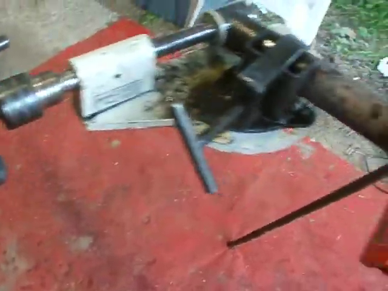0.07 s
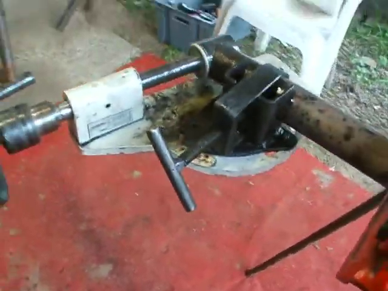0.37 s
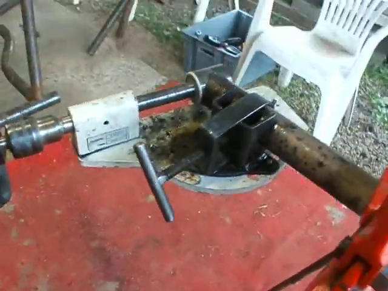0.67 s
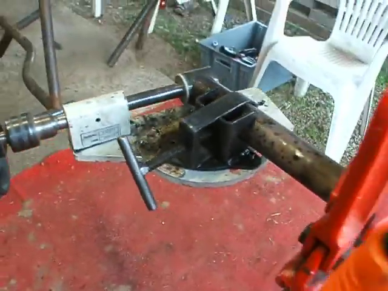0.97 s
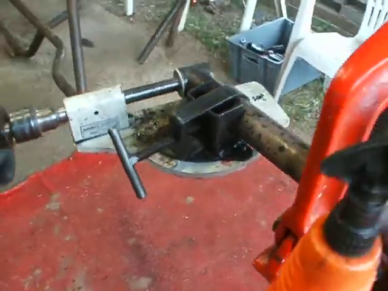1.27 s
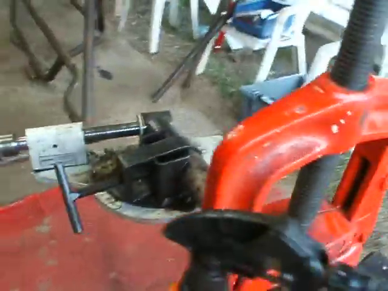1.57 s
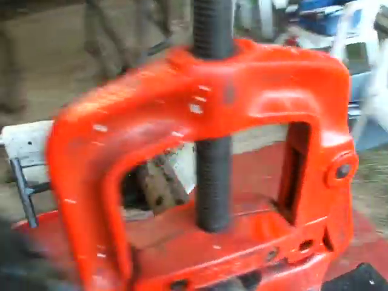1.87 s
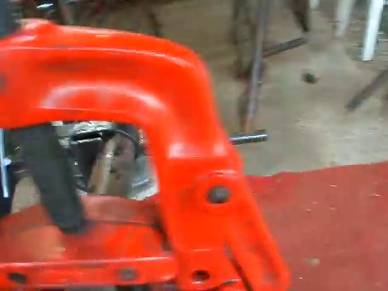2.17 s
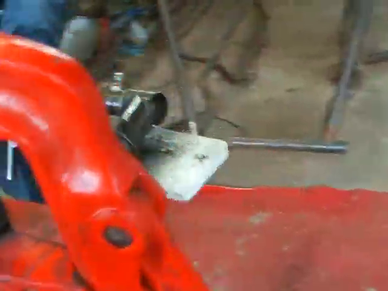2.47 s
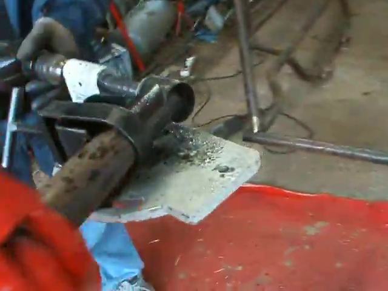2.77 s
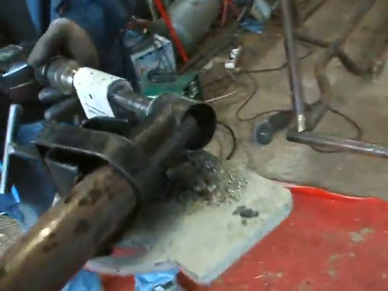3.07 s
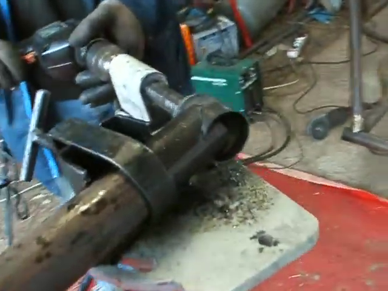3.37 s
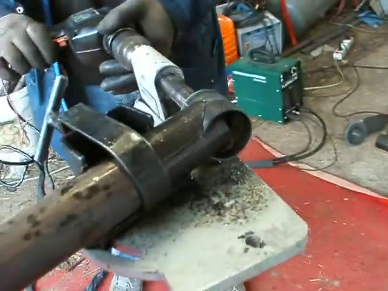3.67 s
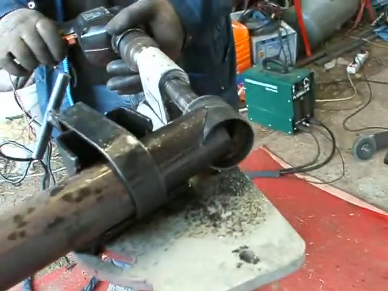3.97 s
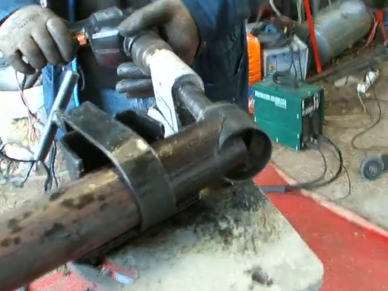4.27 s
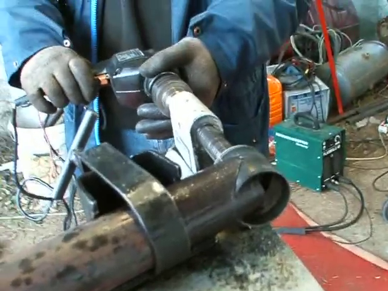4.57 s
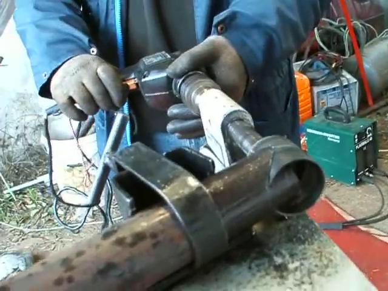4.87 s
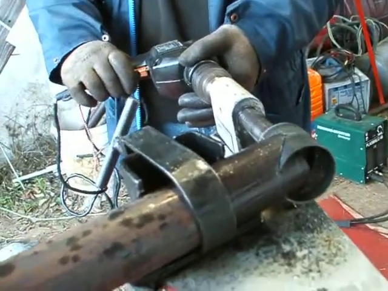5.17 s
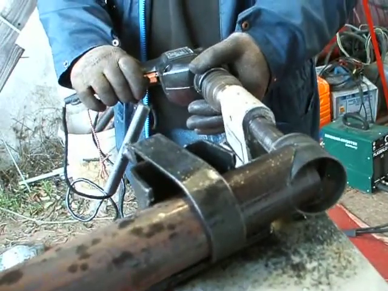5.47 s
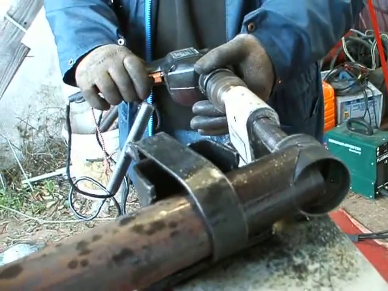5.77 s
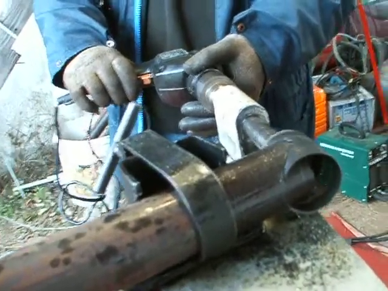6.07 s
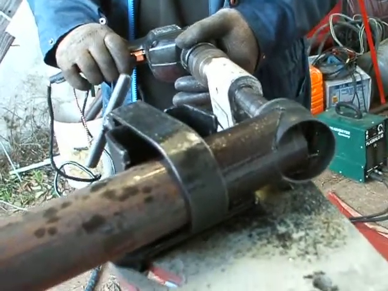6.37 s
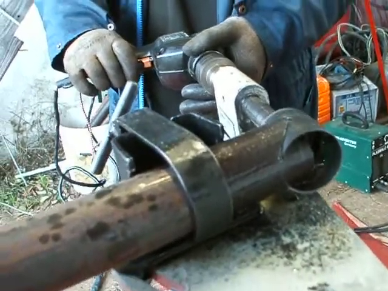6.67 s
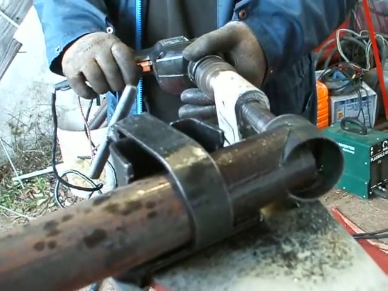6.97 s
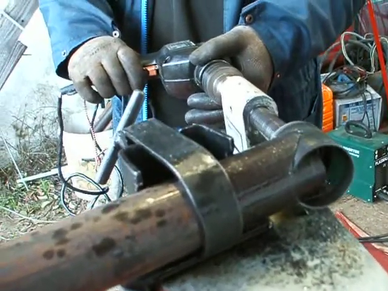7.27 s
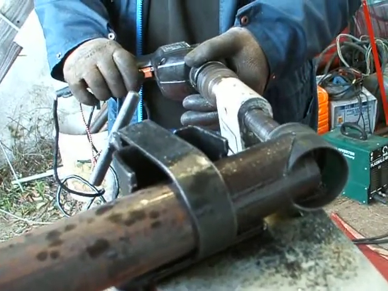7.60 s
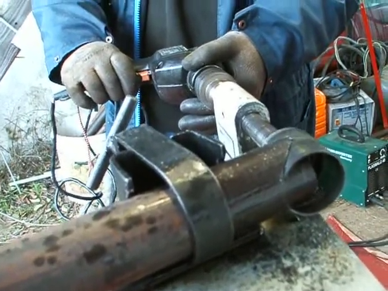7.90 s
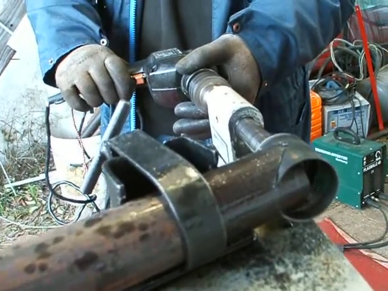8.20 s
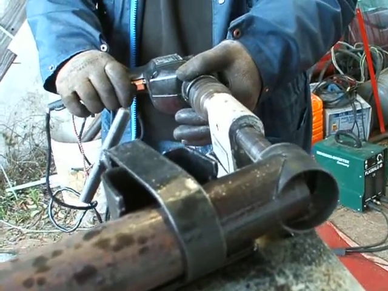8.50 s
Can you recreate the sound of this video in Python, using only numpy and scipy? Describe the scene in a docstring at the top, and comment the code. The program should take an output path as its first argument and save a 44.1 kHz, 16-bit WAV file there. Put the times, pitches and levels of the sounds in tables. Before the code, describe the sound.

A power drill grinds a hole saw through steel pipe, with rapid ringing chatter, harsh scraping and brief squeals.

```python
"""A power drill drives a hole saw through a steel pipe clamped in a jig, about 21 turns a second.
From the start the teeth knock, scrape and chatter in a lopsided pattern on every turn, ringing the
pipe, saw cup and jig over the motor's hum. Soon teeth also catch, chirp and slip, and the steel squeals.
After about two seconds the listener moves from beside the jig, past the vice, to face the drill.
In the last two seconds the saw spins a little faster and cuts on more evenly."""
import sys
import numpy as np
from scipy import signal
from scipy.fft import rfft, irfft
from scipy.io import wavfile

SR = 44100
rng = np.random.default_rng(int(sys.argv[2]) if len(sys.argv) > 2 else 0)


def wrap_up_sound(samples):
    """Save the sound to the file named by the first command line argument, as 16-bit audio."""
    columns = np.atleast_2d(samples).T
    # keep every value between -1 and 1, then stretch to whole-number steps
    tamed = np.clip(columns, -1, 1)
    steps = np.round(tamed * 32767).astype(np.int16)
    wavfile.write(sys.argv[1], SR, steps)


N = 385434
T = np.arange(N) / SR
TOP_HZ = 8750  # upper edge of the sound
RING_S = 0.0016  # chirps and chatter longer than this fall less in pitch

# Speed of the saw, which sags when the drill is leant on: time_s, turns_per_s
SAW_SPEED = [(0, 21.41), (.42, 20.42), (.87, 22.04), (1.22, 22.04), (1.44, 20.83), (2.04, 20.07),
             (2.38, 21.33), (2.78, 21.65), (3.37, 19.93), (3.7, 19.74), (4.16, 21.43), (4.98, 20.51),
             (5.4, 19.77), (6.18, 21.15), (6.57, 22.24), (8.24, 22.33), (8.74, 23.01)]
# Where the listener is: time_s, place (0 beside the jig, 1 at the vice, 2 in front)
LISTENER_PATH = [(0, 0.088), (2.25, 0.013), (2.4, 1.3), (2.8, 0.67), (3.5, 1.56), (8.74, 2)]


def knocks(turns, slam_db=-11, rub_db=-2, ping_db=-4):
    """Tooth blows, pinging burrs (rough bits of steel) and a little rubbing shake the pipe and jig."""
    rub = filt(rng.standard_normal(N), 400, "high", order=1)
    blows = filt(teeth(turns, memory=0.79, jitter_s=.00005), 520, "high", order=4)
    force = blows + undb(slam_db) * high_tooth(turns) + undb(rub_db) * rub
    force = unit(filt(force, 2700, "low", order=3))
    force += undb(ping_db) * pings(turns, 724, 2790, length_s=0.0021, spread_db=1, count=22)
    knock_gain, _ = bite(turns)
    return ring_steel(force * knock_gain * undb(0.2 * walk(70)), tail_db=-3.5, tail_s=0.026)


def scrape(turns, edge_db=-5, ping_db=-4, grain_db=3, hiss_hz=7300, wobble_db=1.5, rub_angle=0.92):
    """Chips shear off in tiny slips, mixed with the ticks and pings of the tooth edges."""
    slips = unit(rng.standard_normal(N) * undb(grain_db * walk(2500)))
    force = slips + undb(edge_db) * teeth(turns, memory=0.67, jitter_s=.00015)
    force = filt(force, 2900, "high", order=3)
    force = unit(filt(force, TOP_HZ, "low", order=8))
    force += undb(ping_db) * pings(turns, 2864, 7475, length_s=0.0022, spread_db=0, count=30)
    # the cup wobbles and rubs the wall once a turn, which brightens the highest hiss
    wobble = undb(wobble_db * np.cos(2 * np.pi * (turns - rub_angle)))
    force = filt(force, hiss_hz, "low", order=7) + wobble * filt(force, hiss_hz, "high", order=7)
    _, scrape_gain = bite(turns)
    return ring_steel(force * scrape_gain * undb(walk(90)), tail_db=-6, tail_s=0.054)


def teeth(turns, memory, jitter_s, count=90):
    """Unevenly spaced teeth hit both walls of the cut; each blow is like the one a turn before."""
    laps = np.arange(-1, int(turns[-1]) + 2)[:, None]
    angles = (np.arange(count) + rng.random(count)) / count
    chance = rng.standard_normal((256, 2, count))[:len(laps)]
    strength = signal.lfilter([1], [1, -memory], chance[:, 0], axis=0)
    when = np.interp(laps + angles, turns, T, left=-1, right=-1) + jitter_s * chance[:, 1]
    at = np.round(when * SR).astype(int)
    inside = (at >= 0) & (at < N)
    return unit(np.bincount(at[inside], strength[inside], N))


def high_tooth(turns, angle=.37, scatter_db=1, front_db=-7):
    """One tooth sticks out and slams the wall once a turn, loudest from beside the jig."""
    laps = np.arange(int(turns[-1] - angle) + 1)
    at = (np.interp(laps + angle, turns, T) * SR).astype(int)
    place, = curves(LISTENER_PATH)
    level_db = front_db * place[at] / 2 - scatter_db * rng.standard_normal(256)[:len(laps)]
    return unit(np.bincount(at, undb(level_db), N))


def pings(turns, low_hz, high_hz, length_s, spread_db, count, life_turns=3):
    """A burr pings at the same angle and pitch for a few turns, until it is cut off and another forms."""
    laps = np.arange(int(turns[-1]) + 1)[:, None]
    burr = (laps / life_turns + rng.random(count)).astype(int)
    angle, pitch, size = rng.random((3, 256, count))[:, burr, np.arange(count)]
    when = np.interp(laps + angle, turns, T, left=-1, right=-1)
    hz = low_hz + (high_hz - low_hz) * (np.arange(count) + pitch) / count
    gain = undb(spread_db * size)
    return unit(short_tones(when.ravel(), hz.ravel(), gain.ravel(), length_s, fall_per_s=35))


def bite(turns, side_depth=0.4, front_depth=1.35):
    """Knock and scrape gains as the saw goes round; the scrape pulses more deeply from the front."""
    # How hard the saw bites round one turn: angle_turns, knock_db, scrape_db (scaled by depth)
    bite_pattern = [(0, -5.5, 1), (.06, -4.5, 2), (.14, -5, -1.5), (.22, -8, -2), (.31, -2.5, 1.3),
                    (.4, -1.5, 0), (.48, -5, -2), (.53, -7, -4.5), (.59, -6.5, -2), (.67, -3, 1.5),
                    (.75, -1, 1.5), (.83, -3.5, 1.2), (.92, -6, .5)]
    angle, *columns = np.transpose(bite_pattern)
    knock_db, scrape_db = [np.interp(turns, angle, column, period=1) for column in columns]
    place, = curves(LISTENER_PATH)
    depth = side_depth + (front_depth - side_depth) * place / 2
    return undb(knock_db), undb(depth * scrape_db)


def grip_loss_db(drop_s=0.02):
    """The saw slips free: the level drops quickly, then climbs back as the teeth dig in again."""
    # Slips of the saw: start_s, drop_db, recovery_s
    slips = [(.88, 1.5, 0.39), (1.28, 1.5, 0.18), (1.764, 4, 0.22), (2.115, 2, 0.24), (2.32, 4, 0.19),
             (4.361, 1.5, 0.16), (4.92, 2, 0.68), (5.79, 1.5, 0.15), (7.64, 1.5, 0.74)]
    loss_db = 0
    for start, drop_db, recovery_s in slips:
        drop = np.clip((T - start) / drop_s, 0, 1)
        still_loose = np.clip(1 - (T - start - drop_s) / recovery_s, 0, 1)
        loss_db += drop_db * drop * still_loose
    return loss_db


def cup_flares(scraping):
    """When the saw bites deeper, one ringing note of its cup stands out from the scraping."""
    # Deeper bites: start_s, end_s, pitch_hz, width_hz, lift_db
    surges = [(.85, 1.5, 5850, 400, 3.5), (2.15, 2.34, 6270, 400, 6), (2.45, 3.2, 6780, 300, 7),
              (3.1, 3.6, 4620, 250, 4), (3.4, 4.3, 7330, 200, 4), (3.65, 4.4, 6100, 700, 2.5),
              (3.7, 4.5, 4100, 400, 3), (4, 6.2, 5020, 80, 5), (6.1, 9, 4950, 90, 6)]
    out = scraping
    for start, end, hz, width_hz, lift_db in surges:
        band = signal.lfilter(*signal.iirpeak(hz, hz / width_hz, fs=SR), scraping)
        out = out + (undb(lift_db) - 1) * swell(T, start, end) * band
    return out


def ring_steel(force, tail_db, tail_s):
    """A force rings the pipe, cup and jig, whose tone changes as the listener moves round them."""
    force = signal.oaconvolve(force, bending_waves(tail_db, tail_s), "same")
    place, = curves(LISTENER_PATH)
    heard = 0
    for spot in range(3):
        share = np.clip(1 - abs(place - spot), 0, 1)
        heard += share * unit(signal.oaconvolve(force, steel_response(spot))[:N])
    return unit(heard)


def steel_response(place, size=4096):
    """How the steel rings after one sharp tap, heard from one place."""
    # Broad tone of the steel: pitch_hz, beside_db, vice_db, front_db
    tone_shape = [(60.0, -35.5, -29, -31.5), (136, -15, -16, -21), (212, -10, -14.5, -10),
                  (223, 1, -9.5, -3.5), (388, -12.5, -6, -7), (525, -6.5, -10.5, -6), (570, -2.5, -2, -6.5),
                  (1790, -1.5, -7, -5), (3120, -4, -2, -8), (3790, -4, 0, -2.5), (6500, -4, -2, -7),
                  (7260, -8, -6, -7), (8050, -10, -7, -14.5), (8700, -26, -22, -24)]
    # Ringing notes of pipe, cup and jig, and dips between: pitch_hz, width_hz, beside_db, vice_db, front_db
    resonances = [(291, 54, 4, 3.5, -0.5), (346, 130, 6.5, -0.5, 1), (484, 19, 1, 8.5, 5.5),
                  (590, 70, -0.5, 5.5, 7.5), (659, 49, -1.5, 3.5, -2.5), (677, 43, 5, 0, 9.5),
                  (732, 55, 1.5, -8.5, 2.5), (815, 12, 0, -3, -0.5), (907, 65, 2.5, 4, 4.5),
                  (1157, 29, 6.5, 3, 3.5), (1220, 25, -0.5, -3, -5.5), (1304, 71, 2.5, 4, 6),
                  (1505, 140, 3, 3.5, 5.5), (1673, 98, 3.5, 3.5, -0.5), (1840, 64, -1, 7, 0),
                  (2107, 110, 0, 4.5, 2), (2500, 610, 1, -1, 3.5), (2936, 79, -1.5, 0, 6.5),
                  (2990, 120, 2, 0, -6), (3270, 140, 5, 1, -0.5), (3484, 110, 5, 0.5, 5.5),
                  (4370, 130, -0.5, -3, 1), (4580, 110, 1, 2, 4.5), (4800, 180, 2, 1, -6),
                  (5400, 160, 0, -1, -3), (5635, 110, 3, 2, 7), (6080, 460, 3.5, 2.5, 5.5),
                  (6470, 270, 0, 0, 2), (7290, 310, 1.5, 0.5, 3), (7370, 120, 1, 4.5, 1)]
    hz = np.arange(size // 2 + 1) * SR / size + 1
    shape_hz, *shape_db = np.transpose(tone_shape)
    db = np.interp(np.log(hz), np.log(shape_hz), shape_db[place])
    for pitch_hz, width_hz, *lift_db in resonances:
        db += lift_db[place] * peak(hz, pitch_hz, width_hz)
    # minimum phase: all the ringing comes after the tap, none before it
    cepstrum = irfft(np.log(undb(db)))
    cepstrum[1:size // 2] *= 2
    cepstrum[size // 2 + 1:] = 0
    return irfft(np.exp(rfft(cepstrum)))


def bending_waves(tail_db, tail_s, size=4096):
    """Waves in the steel reach the air by many paths, which shifts each pitch in time but not in level."""
    paths = rng.standard_normal(size) * undb(-60 * T[:size] / tail_s)
    paths *= undb(tail_db) / np.linalg.norm(paths)
    paths[0] += 1
    spectrum = rfft(paths, 2 * size)
    return np.roll(irfft(spectrum / abs(spectrum)), size)


def chatter(turns, detune=.009, scatter_db=1.8, jitter_s=.00008, fall_per_s=14):
    """Each chattering tooth rings the steel once a turn, a little different in pitch and force each time."""
    # Chattering teeth: start_s, end_s, angle_turns, pitch_hz, length_s, level_db
    chattering_teeth = [(-.3, 2.6, .76, 710, .003, -28.5), (-.3, 1.9, .42, 690, .004, -31),
                        (-.3, 2.4, .39, 1450, .0018, -25), (-.3, 2.4, .76, 1600, .0018, -26.5),
                        (-.3, 1.8, .35, 2200, .0017, -26.5), (-.3, 1.8, .68, 1080, .002, -30),
                        (-.3, 1.2, .38, 4450, .002, -29), (3.3, 6.1, .09, 740, .003, -31),
                        (2.6, 6.1, .72, 695, .004, -34), (3, 6.1, .77, 1490, .0018, -25),
                        (2.6, 6.1, .42, 1300, .0025, -31), (3, 6.1, .32, 1860, .002, -29.5),
                        (3.6, 7.4, .06, 6210, .0017, -28), (3.6, 6.1, .69, 4090, .0014, -26),
                        (4, 6.2, .08, 3535, .0045, -27), (4.5, 9, .22, 2520, .003, -30),
                        (6, 9, .1, 840, .004, -35.5), (6, 9, .29, 590, .0035, -35),
                        (6, 9, .37, 670, .004, -35), (6, 9, .71, 760, .003, -34),
                        (6, 9, .78, 1590, .002, -28.5), (6, 9, .41, 1290, .004, -30.5),
                        (6, 9, .33, 1700, .0015, -32), (6, 9, .68, 2050, .0025, -33),
                        (6, 8, .63, 3850, .0014, -28), (5.5, 9, .88, 4530, .004, -30.5),
                        (1.9, 2.36, .16, 815, .006, -26), (1.4, 2.32, .45, 1670, .004, -26.5)]
    laps = np.arange(int(turns[-1]) + 1)
    out = 0
    for start, end, angle, hz, length_s, db in chattering_teeth:
        pitch, strength, late = rng.standard_normal((len(laps), 3)).T
        when = np.interp(laps + angle, turns, T, left=-1, right=-1) + jitter_s * late
        gain = undb(db + scatter_db * strength) * swell(when, start, end)
        fall = fall_per_s * min(1, (RING_S / length_s) ** 2)
        out += short_tones(when, hz * (1 + detune * pitch), gain, length_s, fall, size=768)
    return out


def catches(fade_s=0.014, gain_db=-13, size=2048):
    """A tooth catches and tears a chip free, sending a short, hard crack through the steel."""
    # Torn chips: start_s, strength_db (gain_db is added)
    torn_chips = [(.076, -2.5), (.542, -11), (1.092, -0.5), (1.186, -12), (1.273, -5.5), (1.756, -17),
                  (2.071, -1), (3.525, -4), (3.757, -4.5), (4.053, -3), (5.551, -0.5), (7.588, -4)]
    force = np.zeros(N + size)
    for start, db in torn_chips:
        at = int(start * SR)
        force[at:at + size] += undb(db + gain_db - 60 * T[:size] / fade_s) * rng.standard_normal(size)
    return np.std(force) * ring_steel(filt(force[:N], 450, "high"), tail_db=0, tail_s=0.068)


def chirps(turns, fall_per_s=20, detune=.008):
    """A snagged tooth slips with a short falling chirp, once a turn until it clears."""
    # Snagged teeth: start_s, turn_count, pitch_hz, length_s, level_db
    snags = [(.738, 1, 6100, .0016, -15), (2.023, 2, 5240, 0.0042, -21.5), (2.055, 4, 1590, 0.0024, -28),
             (2.247, 2, 2520, 0.0027, -19.5), (2.248, 4, 1890, 0.0024, -21), (2.437, 5, 2050, 0.0022, -22),
             (4.381, 1, 4100, 0.0022, -29), (4.475, 1, 4030, .002, -18), (4.69, 1, 3510, 0.0045, -25),
             (4.892, 1, 3500, 0.0068, -21.5), (7.03, 1, 2450, .002, -19)]
    repeats = [(np.interp(start, T, turns) + lap, *sound)
               for start, turn_count, *sound in snags for lap in range(round(turn_count))]
    angle, hz, length_s, db = np.transpose(repeats)
    when = np.interp(angle, turns, T)
    hz = hz * (1 + detune * rng.standard_normal(len(repeats)))
    fall = fall_per_s * np.minimum(1, (RING_S / length_s[:, None]) ** 2)
    return short_tones(when, hz, undb(db), length_s[:, None], fall)


def squeals(turns, flutter_db=2, waver_hz=18):
    """Rubbing keeps a note of the cup or pipe singing for a while, pulsing with the bite."""
    # Singing notes: start_s, end_s, pitch_hz, level_db
    notes = [(1.1, 1.85, 745, -37), (1.9, 2.35, 815, -39), (1.4, 2.35, 1695, -39), (2.3, 2.95, 1675, -39),
             (1.9, 2.68, 5040, -39), (2.45, 2.67, 5050, -40), (2.6, 2.88, 3400, -38), (4.1, 4.9, 6035, -43),
             (2.2, 3.15, 278, -49), (6.1, 8.3, 5635, -49), (4.4, 6.2, 3515, -45), (6.1, 8.7, 1300, -50)]
    _, scrape_gain = bite(turns)
    pressure = scrape_gain ** 1.5
    out = 0
    for start, end, hz, db in notes:
        tone = np.sin(2 * np.pi * np.cumsum(hz + waver_hz * walk(120)) / SR)
        out += undb(db) * swell(T, start, end) * unit(tone * pressure * undb(flutter_db * walk(30)))
    return out


def pipe_drone(turns, pitch_hz=578, width_hz=38, angle=.3):
    """A push on every turn keeps the hollow pipe humming near its own pitch."""
    # Loudness of the pipe's hum: time_s, level_db
    hum_levels = [(0, -35), (.55, -39), (1, -50), (2.4, -46), (3, -41), (3.6, -43), (4.7, -41.5),
                  (5.3, -46), (6.6, -50)]
    level_db, = curves(hum_levels)
    pushes = np.diff(np.floor(turns - angle), prepend=np.floor(turns[0] - angle))
    pipe = signal.iirpeak(pitch_hz, pitch_hz / width_hz, fs=SR)
    return undb(level_db) * unit(signal.lfilter(*pipe, signal.lfilter(*pipe, pushes)))


def motor(turns, flutter_db=2.5, jig_hz=484, jig_width_hz=30, jig_lift_db=9):
    """Motor and gears hum in step with the saw; a tone near the jig's own pitch grows louder."""
    # Motor and gear tones: cycles_per_turn, beside_db, vice_db, front_db
    tones = [(11, -54, -56, -55.5), (13, -53, -50.5, -63), (16, -57, -62, -58.5), (17, -58, -59, -57.5),
             (19, -61, -60, -60), (22, -53, -53.5, -59.5), (31, -52, -47.5, -53), (34, -51, -55, -49.5)]
    place, = curves(LISTENER_PATH)
    turns_per_s, = curves(SAW_SPEED)
    out = 0
    for cycles, *place_db in tones:
        lift_db = jig_lift_db * peak(cycles * turns_per_s, jig_hz, jig_width_hz)
        db = np.interp(place, [0, 1, 2], place_db) + lift_db + flutter_db * walk(15)
        out += undb(db) * unit(np.sin(2 * np.pi * cycles * turns))
    return out


def yard_rumble(level_db=-67.5, top_hz=190):
    """Faint low rumble of the yard."""
    return undb(level_db) * unit(filt(rng.standard_normal(N), top_hz, "low"))


def short_tones(when, hz, gain, length_s, fall_per_s, size=512):
    """Short tones that rise quickly, ring out more slowly and fall in pitch."""
    offset = np.arange(-size, size)
    t = offset / SR
    stretch = np.where(t < 0, .6, 1.4)
    envelope = np.exp(-(t / (stretch * length_s)) ** 2)
    wave = envelope * np.sin(2 * np.pi * hz[:, None] * t * (1 - fall_per_s * t / 2))
    at = np.round(when * SR).astype(int)[:, None] + offset
    inside = (at >= 0) & (at < N)
    return np.bincount(at[inside], (gain[:, None] * wave)[inside], N)


def swell(t, start, end):
    """A gain that rises quickly after the start, holds, and dies away just before the end."""
    return abs(np.sin(np.pi * np.clip((t - start) / (end - start), 0, 1))) ** (1 / 4)


def peak(hz, centre_hz, width_hz):
    """A hump that is 1 at the centre pitch and falls away on both sides."""
    return 1 / (1 + (2 * (hz - centre_hz) / width_hz) ** 2)


def undb(db):
    """Turn decibels into a gain."""
    return 10 ** (np.asarray(db) / 20)


def unit(x):
    """Scale to an average (rms) level of 1."""
    return x / np.sqrt(np.mean(x ** 2))


def curves(table):
    """Columns of a time table, joined by straight lines."""
    times, *columns = np.transpose(table)
    return [np.interp(T, times, column) for column in columns]


def filt(x, hz, kind, order=2):
    """Keep the "low" or the "high" side of a pitch."""
    return signal.sosfilt(signal.butter(order, hz, kind, fs=SR, output="sos"), x)


def walk(rate_hz):
    """Smooth random wandering of typical size 1."""
    return unit(np.interp(T * rate_hz, np.arange(N), rng.standard_normal(N)))


def scene(start_angle=.03, unsteady_db=0.37, scrape_grip_share=0.96):
    """The turning saw times the cut; how it is fed into the steel, and its slips, set how loud."""
    # Strength of the cut while the saw grips fully: time_s, knock_db, scrape_db
    feed = [(0, -25, -25), (1.6, -25.5, -25.5), (2.05, -25.5, -25), (2.65, -26.5, -27.5),
            (2.95, -28.5, -28.5), (3.45, -29.5, -28.5), (3.85, -29, -27.5), (4.8, -28, -26),
            (5.7, -27.5, -26), (6.55, -31, -27.5), (7.55, -29.5, -26.5), (8.74, -30.5, -27)]
    knock_db, scrape_db = curves(feed)
    turns_per_s, = curves(SAW_SPEED)
    turns = start_angle + np.cumsum(turns_per_s) / SR  # all angles are counted in turns
    grip_db = unsteady_db * walk(21) - grip_loss_db()
    mix = undb(knock_db + grip_db) * knocks(turns)
    mix += undb(scrape_db + scrape_grip_share * grip_db) * cup_flares(scrape(turns))
    mix += undb(grip_db) * chatter(turns)
    mix += catches() + chirps(turns) + squeals(turns)
    mix += pipe_drone(turns) + motor(turns) + yard_rumble()
    return mix[None]


def record(dry):
    """Cut the highest treble off steeply."""
    return signal.sosfilt(signal.ellip(10, .2, 80, TOP_HZ, fs=SR, output="sos"), dry)


dry = scene()
out = record(dry)
wrap_up_sound(out)
```